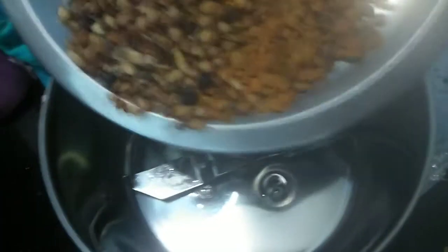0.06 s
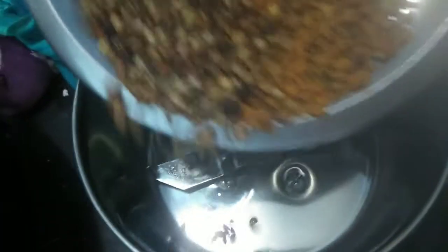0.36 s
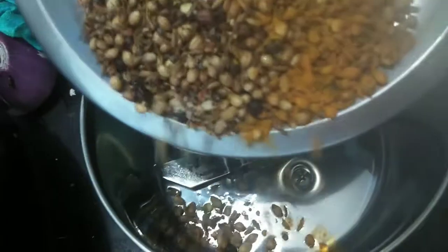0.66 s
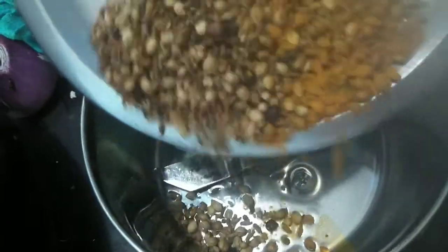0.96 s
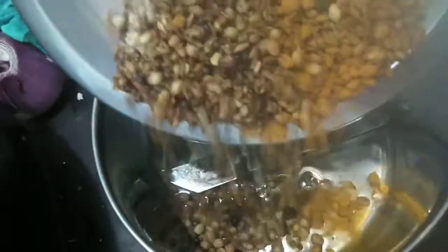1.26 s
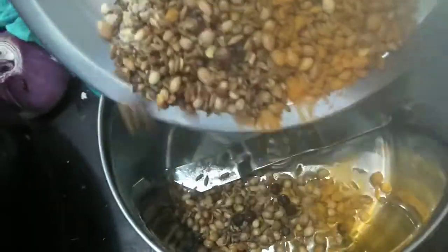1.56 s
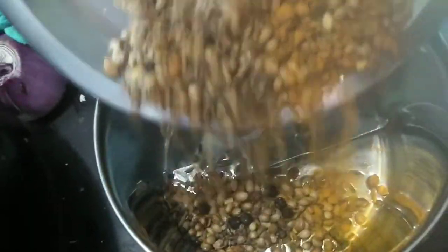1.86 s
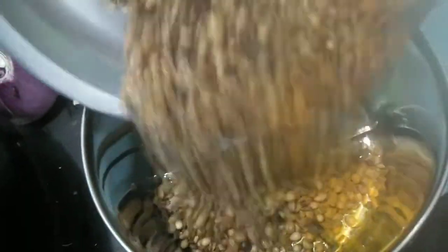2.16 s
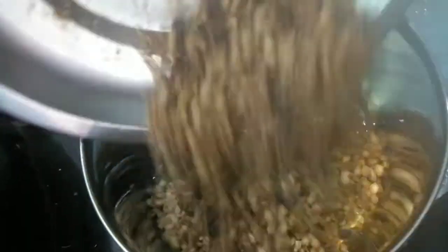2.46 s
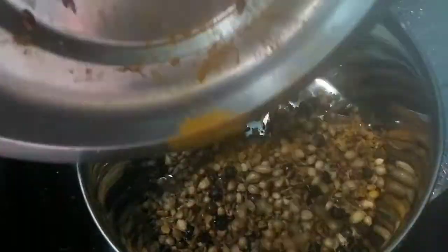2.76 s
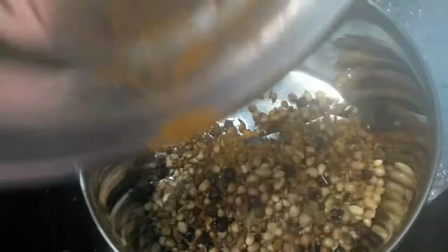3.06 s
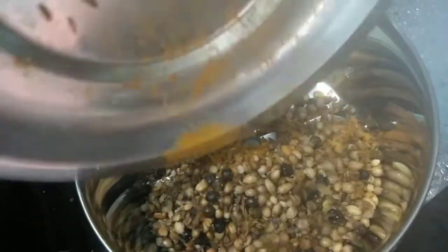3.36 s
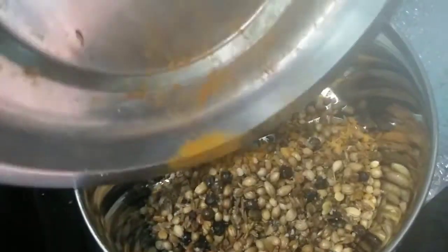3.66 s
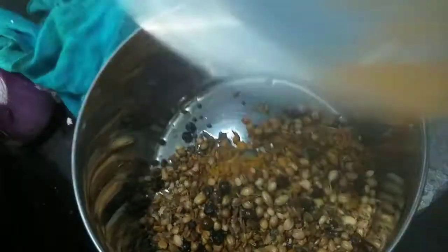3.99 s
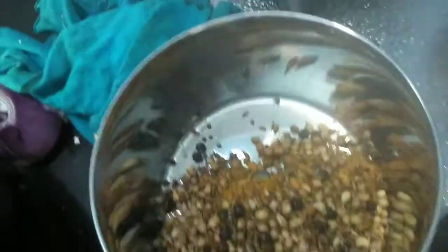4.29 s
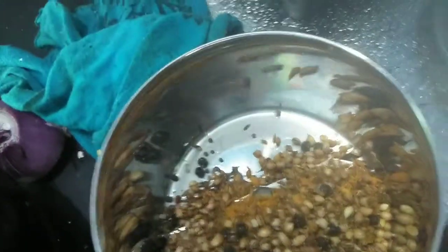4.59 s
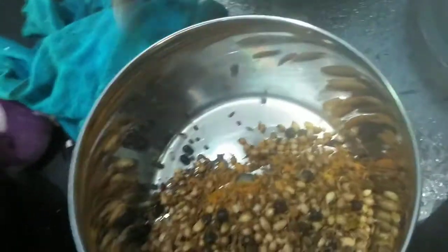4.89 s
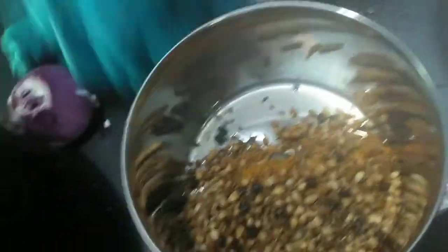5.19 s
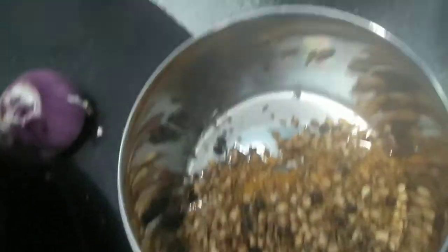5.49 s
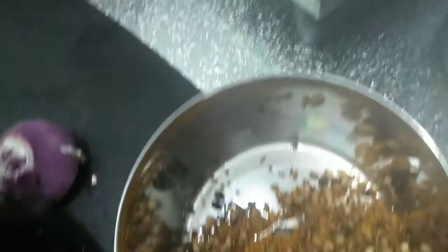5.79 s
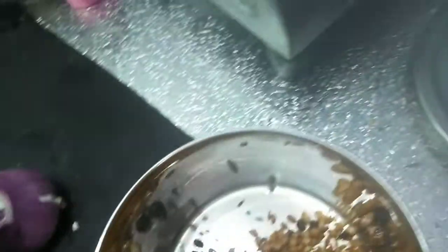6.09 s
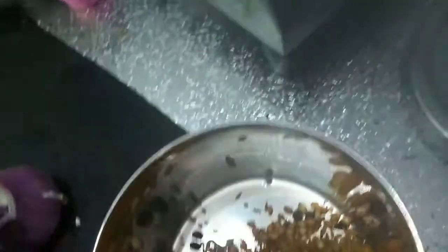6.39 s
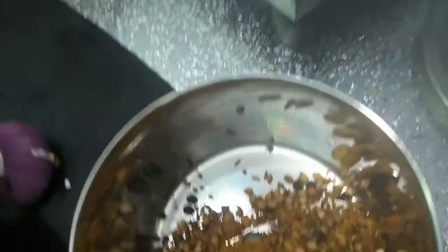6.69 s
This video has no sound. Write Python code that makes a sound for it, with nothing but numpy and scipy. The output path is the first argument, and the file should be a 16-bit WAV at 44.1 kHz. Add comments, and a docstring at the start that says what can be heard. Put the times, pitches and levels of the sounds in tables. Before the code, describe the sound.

Dry spices slide off a steel plate and tick into a steel grinder jar, first as a trickle and then as a whole heap, over a steady fan-like rush. The empty plate scrapes and taps the jar's rim, and the rush cuts off. The plate is put down with a clank and rings as it rocks. Two dull knocks and a short scrape follow, all heard close in a small, faintly humming kitchen.

```python
"""Dry spices slide off a hand-held steel plate and tick into a steel grinder jar, first a trickle and then the
whole heap, over a steady fan-like rush. The emptied plate scrapes and taps the jar's rim, and the rush breaks
off abruptly. The plate is put down with a clank and rings as it rocks to rest. Two duller knocks and a short
scrape follow on the counter, in a small kitchen with a faint hum."""
import sys
import numpy as np
from scipy import signal
from scipy.fft import rfft, irfft, next_fast_len
from scipy.io import wavfile
from scipy.ndimage import map_coordinates

SR = 44100
rng = np.random.default_rng(int(sys.argv[2]) if len(sys.argv) > 2 else 0)


def wav_out(sig):
    """Save sig, one row per channel (or a flat mono array), as 16-bit PCM at SR to the path in sys.argv[1]."""
    wavfile.write(sys.argv[1], SR, np.round(np.clip(np.atleast_2d(sig).T, -1, 1) * 32767).astype(np.int16))


N = 306298
TIME = np.arange(N) / SR  # seconds into the scene
AGE = np.arange(SR // 2) / SR  # seconds since a hit

# the tones of the steel jar: f/Hz, level/dB, t60/s (the time to fade by 60 dB)
JAR_TONES = [(1430, -6, .06), (1900, -4, .04), (2020, -4, .05), (3560, -5, .04), (4270, -3, .05),
             (4550, -5, .06), (5340, -5, .05), (6280, -3, .06), (6680, -3, .08), (7250, -2, .09),
             (7700, -7, .07)]
# the plate rubs along the jar's rim: t/s, length/s, level/dB
RIM_RUBS = [(2.87, 0.22, -49.5), (3.238, 0.07, -38.5), (3.36, 0.11, -78), (3.653, 0.19, -50)]
RUB_RISE_S, RUB_FADE_S = 0.091, 0.36
# the plate lands and rocks on the counter: t/s, level/dB
PLATE_LANDINGS = [(4.3612, -18.5), (4.417, -24.5), (4.439, -27.5), (4.5162, -28), (4.571, -27.5),
                  (4.6294, -28), (4.6692, -29), (4.709, -22.5), (4.739, -34)]


def sliding_seeds():
    """Sliding seeds and the rubbing rim hiss, tinkle and ring the plate; stray seeds hit the jar."""
    # the plate is tipped twice: t/s, length/s, level/dB, swell/(dB per s)
    tips = [(0.08, 1.19, -56.5, 3), (1.652, 0.95, -56, 5.5)]
    # the plate's ring under the seeds: f/Hz, width/Hz, level/dB
    plate_peaks = [(1600, 160, -3), (1770, 220, 8), (2650, 38, -4.5), (3354, 32, 3), (4530, 58, -3.5),
                   (6200, 65, 2.5), (6210, 180, -12.5), (7300, 110, -13.5)]
    pours = sum(stroke(s, length, db + swell * np.clip(TIME - s, 0, length), rise_s=0.049, fade_s=0.74)
                for s, length, db, swell in tips)
    rubs = sum(stroke(*rub, RUB_RISE_S, RUB_FADE_S) for rub in RIM_RUBS)
    contacts = grains(per_s=900, spread_db=2.5) * amp(2.5 * wobble(40))
    colour = [(1600, -12.5), (3300, 1.5), (5000, -9), (6500, -3), (8000, -10)]
    steel = unit(filtered(contacts, lambda hz: resonances(plate_peaks, hz) * amp(along(colour, hz))))
    husks = noise([(1500, -8), (5000, -11.5), (6300, -6.5), (7600, -11), (8300, -14.5)])
    slide = amp(-10) * steel + amp(-5.5) * husks + amp(-11) * tinkles()
    return (pours + rubs) * slide + pours * amp(-6) * stray_seeds()


def tinkles():
    """Tiny high notes at scattered pitches, up to the plate's first landing."""
    out = np.zeros(N)
    t = AGE[:SR // 16]
    for when, pitch, size in rng.random((2000, 3)):
        note = np.sin(2 * np.pi * (6100 + 1600 * pitch) * t) * fade(0.025, t) * (1 - fade(0.004, t))
        add(out, when * PLATE_LANDINGS[0][0], amp(18 * size ** 3) * note)
    return unit(out)


def stray_seeds():
    """Seeds hit bare steel at random, each with a click and a ring of the jar."""
    steel = unit(ring(*np.transpose(JAR_TONES), scatter_db=6.5))
    click = unit(rng.standard_normal(len(AGE)) * fade(0.008))
    hits = grains(per_s=39, spread_db=2.5)
    return unit(signal.fftconvolve(hits, steel + amp(7) * click)[:N])


def seed_ticks():
    """One hard seed gives a dry snap and a brief ring of the jar."""
    # single seeds hitting the jar: t/s, level/dB, boost of the lower tones/dB
    ticks = [(0.0858, -36, -17), (0.2054, -37, -13), (0.2666, -37.5, 5), (0.434, -32, 1),
             (0.5836, -41.5, -1), (0.7329, -30, 0), (1.259, -20.5, -10.5), (1.365, -32, -8),
             (1.711, -27, -3.5), (3.931, -41, -29), (3.9645, -40, -16)]
    out = np.zeros(N)
    hz, db, t60 = np.transpose(JAR_TONES)
    for s, tick_db, low_db in ticks:
        colour = [(200, -17), (900, -2), (1500, low_db), (4000, low_db),
                  (6500, -7.5), (7600, -9.5), (8400, -19)]
        snap = noise(colour, len(AGE)) * (fade(0.011) + amp(-16) * fade(0.14))
        steel = ring(hz, db + low_db * (hz < 5000), t60, scatter_db=4.5)
        add(out, s, amp(tick_db) * (amp(-2.5) * snap + amp(-21.5) * steel))
    return out


def grazes():
    """A light graze makes the steel ping around one high pitch."""
    # light touches on steel: t/s, f/Hz, level/dB
    pings = [(1.098, 6180, -47.5), (2.487, 7000, -44), (2.604, 6450, -47), (3.402, 7250, -41),
             (4.495, 7430, -42), (4.938, 6050, -50)]
    out = np.zeros(N)
    for s, hz, db in pings:
        band = filtered(rng.standard_normal(len(AGE)), lambda f: resonances([(hz, 300, 0)], f) ** 2)
        add(out, s, amp(db) * unit(band) * fade(0.12) * (1 - fade(0.0047)))
    return out


def chatter(per_s=22, bright=2.6):
    """The rubbing plate skips unevenly; each skip is t/s, level/dB, brightness/(dB per octave)."""
    skips = []
    for start, length, _ in RIM_RUBS:
        delay, strength = rng.random((16, 2)).T
        ages = RUB_RISE_S / 2 + (np.arange(16) + delay) / per_s
        levels = -45 + 2.5 * (2 * strength - 1)
        skips += [(start + age, db, bright) for age, db in zip(ages, levels) if age < length]
    return skips


def rim_taps():
    """The hand damps the plate, so its taps are short; soft, glancing ones are brighter."""
    # the plate touches the jar's rim: t/s, level/dB
    touches = [(2.939, -36), (3.088, -42.5), (3.1681, -19.5), (3.2124, -34.5), (3.2842, -39.5),
               (3.335, -37.5), (3.607, -17), (3.612, -11.5), (3.745, -37), (3.833, -38.5), (3.854, -43.5)]
    # the tones of the held plate: f/Hz, level/dB, t60/s
    held_tones = [(942, -10, .05), (1655, 4, .085), (1782, -3, .06), (1857, -8, .1), (1897, -4, .11),
                  (2635, 1, .06), (2925, -12, .07), (3305, -4, .09), (3560, -11, .07), (4648, -17, .19),
                  (4735, -16, .1), (6190, -8, .07), (6525, -11, .09), (6665, -17, .12), (7170, -11, .08)]
    # the clash of many crowded tones in a tap: f/Hz, level/dB
    clash_colour = [(30, -35), (100, -8), (600, -17.5), (950, 0.5), (1300, -16), (1750, 3), (2200, -3.5),
                    (3300, 2), (4200, -10.5), (4750, -3), (5300, -15.5), (6400, 0.5), (7300, -7),
                    (8200, -29)]
    out = np.zeros(N)
    hz, db, t60 = np.transpose(held_tones)
    firm_db = -12.5
    taps = [(s, tap_db, 0.35 * (firm_db - tap_db)) for s, tap_db in touches]
    for s, tap_db, bright in taps + chatter():
        tilt = lambda f: amp(bright * np.log2(np.clip(f, 1000, 8000) / 4000))
        steel = ring(hz, db + 20 * np.log10(tilt(hz)), t60, scatter_db=1.5, rough=0.4)
        clash = noise(clash_colour, len(AGE), tilt) * fade(0.061)
        add(out, s, amp(tap_db) * (amp(-5.5) * steel + amp(-3) * clash))
    return out


def plate_set_down():
    """The plate lands on its rim, then rocks flat, which wakes its lower tones."""
    # the tones of the free plate: f/Hz, level on its rim/dB, level lying flat/dB, t60/s
    plate_tones = [(100, -20, -11, 1.0), (416, -24, -13, .4), (511, -24, -17, .35), (661, -16, -7, .32),
                   (699, -8, -20, .5), (871, -24, -4, .36), (1039, -20, -19, .35), (1384, -17, -30, .35),
                   (1630, -22, -4, .32), (1705, -12, -20, .35), (1739, -22, -3, .35), (1847, -1, -11, .42),
                   (1857, -16, 0, .3), (1883, -16, -2, .26), (1914, 0, -11, .36), (2333, -17, -22, .3),
                   (2497, -5, -12, .3), (2842, -28, -13, .24), (3230, -22, -4, .25), (3297, -24, -12, .2),
                   (3399, -22, -13, .22), (3567, -4, -12, .36), (4226, -15, -22, .28),
                   (4394, -12, -22, .27), (4947, 6, -22, .26), (5248, -8, -19, .2), (6207, -13, -30, .16),
                   (6465, -22, -25, .22), (7175, -10, -30, .24), (7722, -20, -28, .22)]
    # how well each pitch carries into the air: f/Hz, level/dB
    carry = [(100, -1.5), (250, -1.5), (690, 0.7), (880, -2), (1900, 1.6), (2500, 0.5), (3300, -3),
             (5000, -3), (7000, 2.5)]
    # the clash of crowded tones, landing on the rim and landing flat: f/Hz, level/dB
    rim_colour = [(60, -50.5), (120, -16.5), (250, -18.5), (600, -11), (1300, -10.5), (2250, -8.5),
                  (2850, -14), (4300, -4), (4750, -8), (5150, 9.5), (5700, -7), (6150, -0.5), (6700, -17),
                  (7600, -10.5), (8000, -28.5)]
    flat_colour = [(65, -52), (120, -5), (300, -2.5), (750, -6), (1350, -18), (2050, 7.5), (2750, -10),
                   (3400, -1), (4300, -3), (5700, -14), (7600, -17), (8300, -29)]
    topple_s, hard_db, settle_s = 0.11, -28, 4.77
    out = np.zeros(N)
    hz, rim_db, flat_db, t60 = np.transpose(plate_tones)
    for s, db in PLATE_LANDINGS:
        flat = min(((s - PLATE_LANDINGS[0][0]) / topple_s) ** 2, 0.95)  # it falls ever faster
        on_rim = 1 - flat
        tone_db = 20 * np.log10(on_rim * amp(rim_db) + flat * amp(flat_db)) + along(carry, hz)
        pressed_t60 = t60 / (1 + on_rim * (hz / 8000) ** 2)  # pressing the rim shortens high tones
        steel = ring(hz, tone_db, pressed_t60, scatter_db=1, rough=0.5)
        force_db = db - hard_db  # harder landings start faster and sound brighter
        onset = 1 - np.exp(-AGE / (0.00058 * amp(-2 * force_db)))
        tilt = lambda f: amp(0.25 * force_db * np.log2(np.clip(f, 1500, 8000) / 4000))
        crowd = on_rim * noise(rim_colour, len(AGE), tilt) + flat * noise(flat_colour, len(AGE), tilt)
        tail = filtered(crowd, lambda f: amp(along([(300, -2.5), (2000, -7), (6000, -15.5)], f)))
        clash = amp(2.5) * crowd * fade(0.037) + tail * fade(0.19 * on_rim + 0.33 * flat)
        add(out, s, amp(db) * onset * (steel + amp(7.5 * on_rim - 0.6 * flat) * clash))
    bass_cut = signal.butter(4, 75, "high", fs=SR, output="sos")  # too small to give off deep bass
    damping = fade(0.77, np.maximum(TIME - settle_s, 0))  # the counter stills the resting plate
    return signal.sosfilt(bass_cut, out) * damping


def counter_knocks():
    """Each knock on the counter is a dull burst of noise, shaped around its own pitch."""
    # things knocked on the counter: t/s, level/dB, f/Hz, t60/s
    knocks = [(3.169, -26.5, 960, 0.058), (4.18, -56, 1800, 0.12), (6.035, -30.5, 960, 0.25),
              (6.7957, -38, 487, 0.22)]
    # the colour all knocks share: f/Hz, level/dB
    colour = [(60, -7), (200, -5), (400, -5.5), (550, 1), (900, -3), (1250, 0), (1800, -7.5), (2300, -2.5),
              (3000, -15), (5600, -14), (7800, -10.5), (8400, -28.5)]
    out = np.zeros(N)
    for s, db, body_hz, t60 in knocks:
        body = lambda hz: amp(-3 * np.abs(np.log2((hz + 1) / body_hz)))
        add(out, s, amp(db) * noise(colour, len(AGE), body) * fade(t60))
    return out


def counter_scrapes():
    """Steel sticks and slips as it is dragged over the counter, with soft rustles and a gritty rasp."""
    # short drags of the steel: t/s, length/s, level/dB
    pushes = [(4.22, 0.07, -73.5), (5.983, 0.024, -40.5), (6.059, 0.033, -41), (6.117, 0.048, -61),
              (6.33, 0.05, -72.5)]
    # soft rustles, and the gritty rasp of a late drag: t/s, length/s, level/dB
    rustles_and_grit = [(4.747, 0.037, -44), (4.87, 0.031, -57.5), (5.032, 0.063, -53), (6.111, 0.079, -50)]
    # the ring of dragged steel: f/Hz, width/Hz, level/dB
    peaks = [(3320, 75, 2), (4220, 130, 3.5), (4640, 82, 2.5), (5700, 170, 0.5), (6400, 120, -4.5),
             (7200, 200, -1.5), (7740, 180, -11)]
    slips = grains(per_s=6000, spread_db=-1)
    colour = [(2000, -12), (3200, -1.5)]
    steel = unit(filtered(slips, lambda hz: resonances(peaks, hz) * amp(along(colour, hz))))
    grit = noise([(100, -19), (300, 0.5), (700, 3.5), (2000, -1.5),
                  (3500, -6.5), (7700, -10), (8400, -25)])
    drags = sum(stroke(*push, rise_s=0.02, fade_s=0.2) for push in pushes)
    rasps = sum(stroke(*move, rise_s=0.028, fade_s=0.27) for move in rustles_and_grit)
    return drags * (steel + amp(-11) * grit) + rasps * grit


def heap_rumble():
    """The heap of spices rumbles as it drops into the jar."""
    # the heap's fall: t/s, length/s, level/dB
    falls = [(1.73, 0.3, -39.5)]
    # its deep rumble: f/Hz, level/dB
    colour = [(30, -26), (65, 4), (95, 3.5), (140, -3), (260, -15), (800, -69.5)]
    return noise(colour) * sum(stroke(*fall, rise_s=0.03, fade_s=1.1) for fall in falls)


def low_bumps():
    """Handling gives low thumps that last only a few swings."""
    # soft bumps: t/s, level/dB, f/Hz, t60/s
    bumps = [(0.731, -35, 72, 0.25), (1.717, -11, 112, 0.047), (1.955, -20, 129, 0.14),
             (6.812, -36, 108.3, 0.16)]
    out = np.zeros(N)
    onset = 1 - np.exp(-AGE / 0.006)
    for s, db, hz, t60 in bumps:
        add(out, s, amp(db) * np.sin(2 * np.pi * hz * AGE) * fade(t60) * onset)
    return out


def rush(stop_s=3.757):
    """A steady fan-like rush with a wavering low drone and thin hiss; it stops abruptly."""
    # the rush and its hiss: f/Hz, level/dB
    air_colour = [(30, -27), (70, -8.5), (135, -5), (170, -6.5), (340, -0.5), (500, 1), (660, -7.5),
                  (840, -13), (1020, -6.5), (1190, -6.5), (1400, -15), (1800, -19), (3100, -21.5),
                  (5500, -43), (10000, -76)]
    hiss_colour = [(3000, -4), (5000, -5), (7600, -3), (8500, -10), (10000, -20), (15500, -27)]
    air = amp(-41 + 0.36 * wobble(3.2)) * noise(air_colour)
    drone = amp(-55.5 + 6 * wobble(1)) * np.sin(2 * np.pi * 80 * TIME + 0.55 * wobble(1.3))
    hiss = amp(-64) * noise(hiss_colour)
    return (air + drone + hiss) * np.clip((stop_s - TIME) / 0.0032, 0, 1)


def still_room():
    """Low room noise with a faint unsteady hum."""
    # the noise of the still kitchen, and the tones of its hum: f/Hz, level/dB
    colour = [(15, -73), (25, -25.5), (112, -10), (154, -14), (192, -7), (227, -13.5), (282, -8),
              (387, -13.5), (481, -15), (570, -19.5), (613, -9), (659, -17.5), (820, -17), (7440, -45),
              (8200, -57), (10700, -83.5), (18000, -120)]
    hum_tones = [(123.8, -58.5), (193.8, -55.5), (290.7, -66)]
    hum = sum(amp(db + 2 * wobble(3)) * np.sin(2 * np.pi * hz * TIME + wobble(6))
              for hz, db in hum_tones)
    return amp(-53 + 0.28 * wobble(8.4)) * noise(colour) + amp(-3) * hum


def kitchen_echo(x):
    """Hard walls answer 5 ms later with a short tail, the treble dying first."""
    # how long the room rings: f/Hz, t60/s
    ring_times = [(150, .4), (1500, 0.27), (7000, 0.21)]
    hz, t, bands = signal.stft(rng.standard_normal(SR // 2), SR, nperseg=256)
    tail = signal.istft(bands * fade(along(ring_times, hz)[:, None], t), SR, nperseg=256)[1]
    return signal.fftconvolve(x, np.pad(tail, (SR // 200, 0)) / np.linalg.norm(tail))[:N]


def ring(hz, db, t60, scatter_db, rough=1.0):
    """Fading tones of struck steel, at new strengths for each hit; shifting contact makes them waver."""
    gain = amp(db + scatter_db * rng.standard_normal(len(hz)))
    phase = rng.uniform(0, 2 * np.pi, (len(hz), 1))
    t = AGE[AGE < t60.max()]
    depth = rough * np.minimum(hz / 170, 1)[:, None]  # low tones waver less
    points = rng.standard_normal((2, len(hz), 36))
    swell, drift = depth * signal.resample(points, len(AGE), axis=2)[:, :, :len(t)]
    tones = np.sin(2 * np.pi * hz[:, None] * t + phase + drift) * (1 + swell) * fade(t60[:, None], t)
    return np.pad(gain @ tones, (0, len(AGE) - len(t))) / np.hypot(1, rough)


def resonances(peaks, hz):
    """Filter curve of a body that rings at each peak: f/Hz, width/Hz, level/dB."""
    return sum((-1) ** k * amp(db) * 1j * hz * width / (centre ** 2 - hz ** 2 + 1j * hz * width)
               for k, (centre, width, db) in enumerate(peaks))


def grains(per_s, spread_db):
    """Tiny hits at random times and with random strengths."""
    hit = rng.random(N) < per_s / SR
    return unit(hit * rng.standard_normal(N) * amp(spread_db * np.minimum(rng.exponential(size=N), 3)))


def noise(colour, size=N, shade=lambda hz: 1):
    """Noise shaped by a colour (f/Hz, level/dB) and an optional extra filter curve."""
    return unit(filtered(rng.standard_normal(size), lambda hz: amp(along(colour, hz)) * shade(hz)))


def stroke(start, length, db, rise_s, fade_s):
    """The loudness of one movement: it rises, holds and dies away."""
    age = TIME - start
    return amp(db) * np.clip(age / rise_s, 0, 1) * fade(fade_s, np.maximum(age - length, 0))


def fade(t60, t=AGE):
    """Die away by 60 dB every t60 seconds."""
    return np.exp(-np.log(1000) * t / np.maximum(t60, 1e-4))


def wobble(per_s):
    """A smooth curve through per_s random values a second."""
    return map_coordinates(rng.standard_normal(int(N * per_s / SR) + 4), [TIME * per_s])


def filtered(x, curve):
    """Scale each frequency of x by a filter curve."""
    size = next_fast_len(len(x) + SR // 4)
    return irfft(rfft(x, size) * curve(np.fft.rfftfreq(size, 1 / SR)), size)[:len(x)]


def along(points, hz):
    """Read between (f/Hz, value) points, evenly in pitch."""
    f, values = np.transpose(points)
    return np.interp(np.log(hz + 1), np.log(f + 1), values)


def amp(db):
    """Turn decibels into a gain."""
    return 10 ** (np.asarray(db) / 20)


def unit(x):
    """Scale to an average (rms) level of 1."""
    return x / np.sqrt(np.mean(x ** 2) + 1e-20)


def add(track, s, sound):
    """Mix a sound in at s seconds."""
    start = round(s * SR)
    track[start:start + len(sound)] += sound[:N - start]


def scene():
    """Seeds, plate and counter with their echo, kept below 9300 Hz, over low thumps and background."""
    near = sliding_seeds() + seed_ticks() + grazes() + rim_taps() + plate_set_down()
    near += counter_knocks() + counter_scrapes()
    treble_cut = signal.cheby2(14, 70, 9300, fs=SR, output="sos")
    heard = signal.sosfilt(treble_cut, near + amp(-12) * kitchen_echo(near))
    return (heard + heap_rumble() + low_bumps() + rush() + still_room())[None]


def record(dry):
    """Keep only the sound below 15700 Hz."""
    return filtered(dry[0], lambda hz: hz < 15700)[None]


dry = scene()
out = record(dry)
wav_out(out)
```